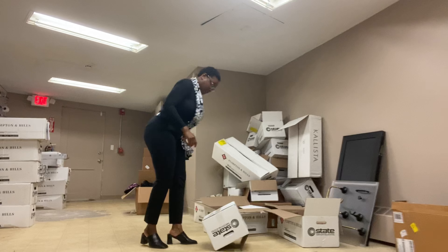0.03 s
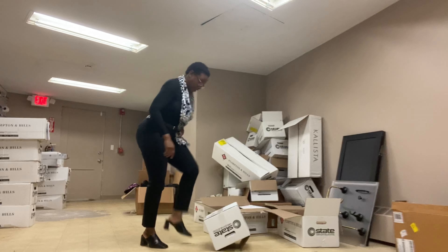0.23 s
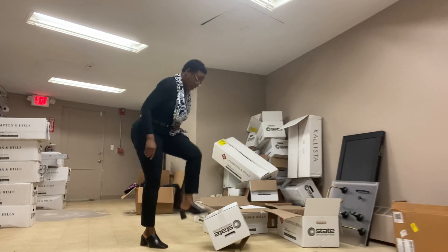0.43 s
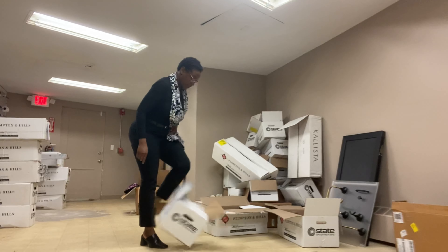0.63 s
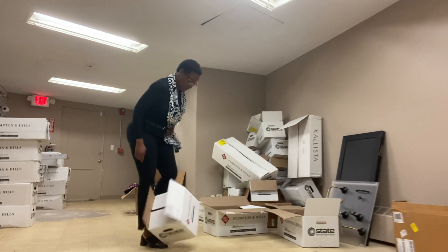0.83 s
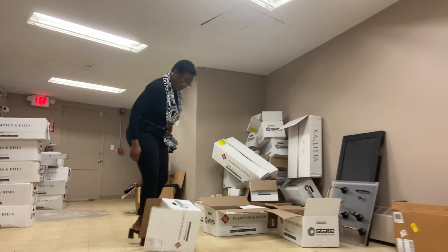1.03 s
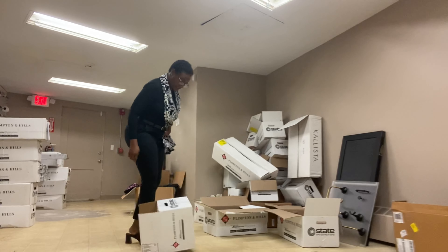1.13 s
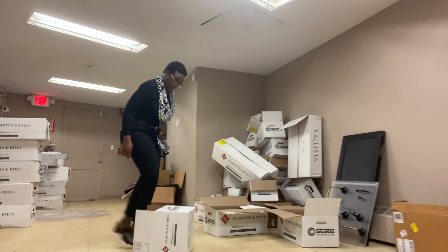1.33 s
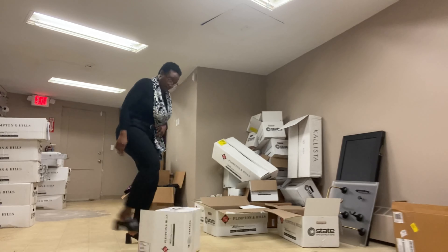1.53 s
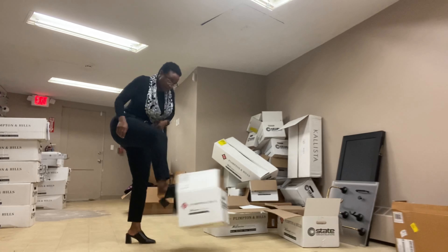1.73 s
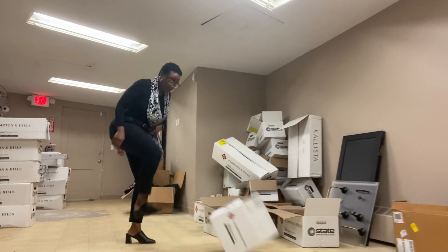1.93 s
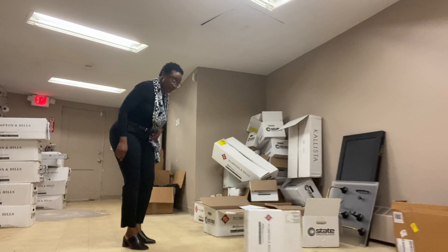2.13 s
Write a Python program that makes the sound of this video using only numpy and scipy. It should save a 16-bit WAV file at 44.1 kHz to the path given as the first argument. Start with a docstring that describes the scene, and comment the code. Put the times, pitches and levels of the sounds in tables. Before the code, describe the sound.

Hollow, papery blows on an empty carton: a loud kick first, then uneven tumbling knocks and scuffs, another kick, and two strong late thumps with rattling flaps; short lively room echo, recorded fairly close in stereo.

```python
"""An empty cardboard box is kicked and tumbles over the hard floor of a bare storeroom. After a faint knock at
the very start and a heel click come the blows: each pushes air, booms in the hollow, knocks the walls and
crackles the board; the heaviest add a falling thud as a wall bends in, flat faces smack, and the box scuffs. A
second heel click falls midway; two strong blows and a weaker one end the tumble, then the flaps rattle. Struck
modes and shaped noise make the sounds; decaying noise makes the room, over a quiet noise floor."""
import sys
import numpy as np
from scipy import signal
from scipy.fft import rfft, irfft
from scipy.io import wavfile
from scipy.ndimage import uniform_filter1d, map_coordinates

SR = 44100
rng = np.random.default_rng(int(sys.argv[2]) if len(sys.argv) > 2 else 0)


def pcm_store(signal):
    """Save signal as 16-bit PCM."""
    levels = np.round(np.clip(np.atleast_2d(signal), -1, 1) * 32767)
    wavfile.write(sys.argv[1], SR, levels.astype(np.int16).T)


N = 96446

CRACKLE_GRAIN_DB = 4.5  # unevenness of the grains in every contact
EVENT_S = 0.5  # length of buffer for one event


def undb(db):
    """Decibels to amplitude ratio."""
    return 10 ** (np.asarray(db) / 20)


def on_log(hz, table, column=1):
    """Reads a table along a log-frequency axis."""
    table = np.array(table, float)
    return np.interp(np.log(np.maximum(hz, 1)), np.log(table[:, 0]), table[:, column])


def seconds(length_s):
    """Time axis [s]."""
    return np.arange(int(length_s * SR)) / SR


def fade(t, t60_s):
    """Exponential decay, down 60 dB at t60_s."""
    return np.exp(-np.log(1000) * t / max(t60_s, 1e-3))


def response(gain_db, size=8192):
    """Minimum-phase impulse response, by folding the cepstrum, of a gain [dB] over frequency."""
    hz = np.arange(size // 2 + 1) * SR / size
    cepstrum = irfft(np.log(undb(gain_db(hz))))
    cepstrum[1:size // 2] *= 2
    cepstrum[size // 2 + 1:] = 0
    return irfft(np.exp(rfft(cepstrum)))


def through(x, impulse_response):
    """Convolution cut to the input length."""
    return signal.fftconvolve(x, impulse_response)[:len(x)]


def colour(x, table):
    """Filters by a table of gain over frequency."""
    return through(x, response(lambda hz: on_log(hz, table)))


def level(x, db):
    """Scales steady sound to an RMS level."""
    return x * undb(db) / np.std(x)


def strength(x, db):
    """Scales an event to the energy of 25 ms at this RMS level."""
    energy_span_s = 0.025
    return x * undb(db) * np.sqrt(energy_span_s * SR / np.sum(x ** 2))


def grains(t, spread_db, size=24):
    """Noise broken into half-millisecond grains of uneven size."""
    draws = np.minimum(rng.exponential(size=len(t) // size + 1), 4)
    sizes = np.repeat(draws, size)[:len(t)]
    return level(rng.standard_normal(len(t)) * undb(spread_db * sizes), 0)


def even(x):
    """Flattens the spectrum of a burst, so that it sounds dry and unpitched; keeps the first half."""
    flat = irfft(np.exp(1j * np.angle(rfft(x))), len(x))
    return flat * (np.arange(len(x)) < len(x) / 2)


def ring(t, modes):
    """Decaying modes of alternating sign; the box flexes, so their tuning differs from blow to blow."""
    scatter = 0.033  # standard deviation, share of the frequency
    total = np.zeros(len(t))
    for k, (hz, db, t60_s) in enumerate(modes):
        tuned_hz = hz * (1 + scatter * rng.standard_normal())
        total += (-1) ** k * undb(db) * fade(t, t60_s) * np.sin(2 * np.pi * tuned_hz * t)
    return total


def add(track, start_s, x):
    """Mixes an event into the track, cut at its end."""
    i = max(int(start_s * SR), 0)
    track[i:i + len(x)] += x[:max(N - i, 0)]


def blow(knock_db, wall_hz, boom_db, air_db, crackle_db, crumple_s):
    """One contact: a push and a short crumple drive the walls; the hollow booms and the board crackles."""
    # modes of the walls: (nominal frequency [Hz], relative level [dB], t60 [s])
    wall_modes = [(293, -1, 0.14), (363.2, 0, 0.093), (423, -1, 0.047), (477, 1.5, 0.057), (667, 0, 0.046),
                  (801, -1.5, 0.06), (1023, -6.5, 0.043), (1147, -8.5, 0.051), (1330, -2.5, 0.042)]
    # modes of the hollow: (nominal frequency [Hz], relative level [dB], t60 [s])
    hollow_modes = [(87.2, -1.5, 0.15), (117.2, 1, 0.1), (146.8, 3, 0.18), (223.7, -2, 0.089),
                    (290.8, -10, 0.37)]
    # colour of the knocked board: (frequency [Hz], relative gain [dB])
    board_colour = [(120, -14), (300, 4.5), (700, 0.5), (1200, -0.5), (1700, -7), (6000, -18),
                    (14000, -33.5)]
    # colour of the crackle: (frequency [Hz], relative gain [dB])
    crackle_colour = [(500, 4.5), (1900, 6), (5500, -4.5), (8500, 4.5), (13000, 0), (15500, -41)]
    # trims added to the levels of each blow
    wall_trim_db, board_trim_db, boom_trim_db, air_trim_db, crackle_trim_db = -10, -11, -5, -11.5, 1
    wall_spread_oct, crumple_share, rise_share = 0.51, 0.71, 0.22
    board_t60_s, crackle_t60_s, boom_rise_t60_s = 0.025, 0.029, 0.028
    air_hz, air_t60_s = 50.7, 0.15
    t = seconds(EVENT_S)

    # the crumple builds over a share of its time
    rise = 1 - np.exp(-t / max(rise_share * crumple_s, 1e-4))
    crumpling = rise * np.exp(-t / max(crumple_s, 1e-3))
    crumple = grains(t, CRACKLE_GRAIN_DB) * crumpling
    push = t == 0
    force = push + crumple_share * crumple / np.linalg.norm(crumple)

    def struck_db(hz):
        """Modes near the pitch of the struck wall respond most."""
        octaves = np.log2(np.maximum(hz, 1) / wall_hz)
        return -10 * np.log10(1 + (octaves / wall_spread_oct) ** 2)

    struck_modes = [(hz, db + struck_db(hz), t60_s) for hz, db, t60_s in wall_modes]
    walls = rise * through(force, ring(t, struck_modes))

    board_noise = grains(t, CRACKLE_GRAIN_DB) * rise * fade(t, board_t60_s + 2 * crumple_s)
    board = through(board_noise, response(lambda hz: on_log(hz, board_colour) + struck_db(hz)))

    crackle_envelope = crumpling + rise * fade(t, crackle_t60_s)
    crackle = colour(even(grains(t, CRACKLE_GRAIN_DB) * crackle_envelope), crackle_colour)

    air = ring(t, [(air_hz, 0, air_t60_s)]) * (1 - fade(t, air_t60_s)) ** 2
    # the hollow swells after the contact
    boom = ring(t, hollow_modes) * (1 - fade(t, boom_rise_t60_s))
    return (strength(walls, knock_db + wall_trim_db)
            + strength(board, knock_db + board_trim_db)
            + strength(boom, boom_db + boom_trim_db)
            + strength(air, air_db + air_trim_db)
            + strength(crackle, crackle_db + crackle_trim_db))


def thud(hz, sag_oct_per_s, db, swell_s):
    """A wall bending under a heavy blow: a sine that swells and dies while its pitch falls."""
    t = seconds(EVENT_S)
    falling_hz = hz * 2 ** (-abs(sag_oct_per_s) * t)
    phase = 2 * np.pi * np.cumsum(falling_hz) / SR
    return strength(t * np.exp(-t / swell_s) * np.sin(phase), db)


def tap(db, t60_s):
    """A hard, dry contact: a burst of gritty noise that dies fast."""
    # colour of the contact: (frequency [Hz], relative gain [dB])
    clack_colour = [(400, -7.5), (900, 9), (1700, 1.5), (3000, -4), (5000, -15.5), (14000, -23)]
    t = seconds(EVENT_S)
    burst = even(grains(t, CRACKLE_GRAIN_DB) * fade(t, t60_s))
    return strength(colour(burst, clack_colour), db)


def scuff(length_s, hiss_db, rumble_db):
    """Board rubbing on the floor: a grainy hiss over the shudder of the box, both following the pressure."""
    # colour of the rubbing: (frequency [Hz], relative gain [dB])
    hiss_colour = [(400, 2), (1200, 20.5), (5500, 2.5), (8500, 11), (13000, 7), (15500, -21)]
    # colour of the shudder: (frequency [Hz], relative gain [dB])
    rumble_colour = [(40, -45.5), (85, -10.5), (145, 20), (200, 1), (300, 12.5), (550, -13), (1100, -3.5),
                     (2500, -65.5)]
    grain_db = -3.5
    rise_share, fall_share = 0.74, 0.12  # of the length
    t = seconds(EVENT_S)
    pressure = np.minimum(t / rise_share, (length_s - t) / fall_share) / length_s
    hiss = level(colour(grains(t, grain_db), hiss_colour), hiss_db)
    rumble = level(colour(grains(t, grain_db), rumble_colour), rumble_db)
    return np.clip(pressure, 0, 1) * (hiss + rumble)


def rattle(count=8):
    """Loose flaps chattering: dry ticks at uneven gaps, each weaker than the last."""
    start_s, decay_s, first_db, tick_t60_s = 2.095, 0.054, -28, 0.006
    track, after_s = np.zeros(N), 0
    for gap_s in rng.uniform(.5, 2, count) / 72:
        add(track, start_s + after_s, np.exp(-after_s / decay_s) * tap(first_db, tick_t60_s))
        after_s += gap_s
    return track


def quiet():
    """Steady background: coloured noise."""
    # colour of the background: (frequency [Hz], relative gain [dB])
    quiet_colour = [(25, -59), (58, 12), (110, -13.5), (1500, -22.5), (13000, -29.5), (15500, -56)]
    return level(colour(rng.standard_normal(N), quiet_colour), -60.5)


def echoes(count=14):
    """Left and right response of the room: a dense noise tail that dies band by band."""
    # the room by band: (frequency [Hz], t60 [s], level against direct sound [dB], left-right likeness [0-1])
    room_bands = [(58.5, 0.91, 1, 0.75), (157, 0.34, 3, 0.95), (378, 0.38, -1, 0.18),
                  (920, 0.48, 1.5, 0.04), (2390, 0.53, 0.5, 0), (5270, 0.37, 6, 0), (8840, 0.38, 0, 0),
                  (14600, 0.42, -5, 0.4)]
    build_s, delay_s = 0.00059, 0.0034
    t = seconds(.8)
    hz = np.maximum(np.arange(len(t) // 2 + 1) * SR / len(t), 1)
    centres_hz = np.geomspace(40, 16000, count)
    noise, tail = rfft(rng.standard_normal((2, len(t)))), 0
    for k, centre_hz in enumerate(centres_hz):
        band = np.interp(np.log(hz), np.log(centres_hz), np.arange(count) == k)
        envelope = fade(t, on_log(centre_hz, room_bands)) * np.clip((t - delay_s) / build_s, 0, 1)
        shaped = irfft(noise * band, len(t)) * envelope
        mid, side = (v * np.sqrt(band.mean() / np.sum(v ** 2)) for v in shaped)
        alike = np.clip(on_log(centre_hz, room_bands, 3), 0, 1)
        common = np.sqrt((1 + alike) / 2) * mid
        opposed = np.sqrt((1 - alike) / 2) * side * np.array([[1], [-1]])
        tail = tail + undb(on_log(centre_hz, room_bands, 2)) * (common + opposed)
    return tail


def diffuse(x, size=13, count=71):
    """Evens out the narrow peaks of an echo, so that no single room mode hums on."""
    spectrum = rfft(x)

    def smooth(bins):
        power = uniform_filter1d(uniform_filter1d(abs(spectrum) ** 2, bins), bins)
        return np.maximum(power, 1e-12)

    flattened = irfft(spectrum * np.sqrt(smooth(count) / smooth(size)), len(x))
    return flattened[:len(x) * 3 // 4]


def storeroom(dry, count=5):
    """Direct sound plus echoes, whose pattern changes as the box moves from spot to spot."""
    out = 0
    place = np.linspace(0, count - 1, N)
    for spot in range(count):
        near = np.sqrt(np.maximum(1 - abs(place - spot), 0))
        out = out + np.array([through(dry * near, diffuse(ear)) for ear in echoes()])
    return dry + out


def scene():
    """Places the contacts, scuffs and rattle in time over the background, then rings the room."""
    # blows on the box: (time [s], wall knock [dB], pitch of struck wall [Hz], hollow boom [dB],
    # air push [dB], crackle [dB], crumpling time [s]); levels before the trims in blow
    blows = [(0.001, -28, 290, -26.5, -33, -46, 0.0019), (0.469, -13, 550, -24, -48, -39.5, 0.011),
             (0.579, -5.5, 590, -11.5, -18, -32.5, 0.0043), (0.693, -16.5, 257, -20, -30, -42.5, 0.012),
             (0.718, -18, 290, -17, -15, -52, 0.012), (0.79, -19.5, 272, -23.5, -34, -50, 0.025),
             (0.97, -10.5, 880, -20, -37, -39, 0.0035), (1.003, -25.5, 744, -19, -32, -44, 0.0056),
             (1.082, -18.5, 510, -21, -44, -47, 0.009), (1.343, -14, 254, -18.5, -27, -47, 0.013),
             (1.421, -25, 684, -18, -43, -47, 0.024), (1.54, -18, 266, -20, -39, -45.5, 0.027),
             (1.590, -9, 650, -15, -39, -34.5, 0.011), (1.607, -11, 308, -14, -37, -64, .006),
             (1.733, -15, 644, -21.5, -43, -41.5, 0.013), (1.960, -12, 810, -11.5, -28, -36, 0.0065),
             (2.027, -11, 590, -11.5, -30, -27.5, 0.0043), (2.094, -14, 790, -35, -36, -34.5, 0.014),
             (2.162, -22.5, 393, -18.5, -37, -34, 0.014)]
    # heavy blows bending a wall: (time [s], starting pitch [Hz], sag [octaves/s], level [dB], swell [s])
    thuds = [(0.579, 677, 50.5, -13, 0.0097), (0.970, 799.3, 0.43, -19, 0.0091),
             (1.589, 703, 5.9, -22, 0.0073), (1.960, 516, 29.1, -13, 0.0047),
             (2.027, 493, 74, -17.5, 0.0043)]
    # broad faces of board against shoe or floor: (time [s], level [dB], t60 [s])
    smacks = [(0.468, -27, 0.11), (.580, -29, 0.028), (0.968, -31, 0.032), (1.589, -24.5, 0.073),
              (1.957, -33, 0.037)]
    # box sliding, flaps brushing: (time [s], length [s], full-pressure hiss [dB], full-pressure rumble [dB])
    scuffs = [(0.481, 0.081, -34, -23), (0.672, 0.035, -36, -25), (0.807, 0.083, -45.5, -33.5),
              (1.229, 0.11, -46.5, -31.5), (1.358, 0.11, -48.5, -26.5), (1.60, 0.15, -41, -25),
              (2.051, 0.28, -42, -28.5)]
    # heel clicks on the floor: (time [s], level [dB])
    heels = [(0.096, -39), (1.149, -36.5)]
    dry = np.zeros(N)
    for source, events in ((blow, blows), (thud, thuds), (tap, smacks), (scuff, scuffs)):
        for start_s, *settings in events:
            add(dry, start_s, source(*settings))
    for start_s, db in heels:
        add(dry, start_s, tap(db, t60_s=0.025))
    return storeroom(dry + rattle() + quiet())


def record(dry):
    """Two close ports of unlike colour, the left later; a treble notch, rounded peaks and a steep top."""
    # left minus right: (frequency [Hz], level difference [dB])
    lean = [(50, -0.5), (110, -2.5), (180, 6), (290, 6.5), (450, 6), (700, 0), (2500, 3), (7000, 0.5)]
    notch_hz, notch_width_hz, notch_depth_db = 10500, 460, -26
    port_lag_ms, peak_limit, top_hz = 0.155, 0.95, 15400

    def port(x, side):
        def gain_db(hz):
            notch_db = notch_depth_db * np.exp(-((hz - notch_hz) / notch_width_hz) ** 2)
            return notch_db + side * on_log(hz, lean) / 2
        return through(x, response(gain_db))

    left, right = port(dry[0], 1), port(dry[1], -1)
    left = map_coordinates(left, [np.arange(N) - port_lag_ms * SR / 1000], order=5)
    both = np.array([left, right])
    both = both / (1 + (both / peak_limit) ** 6) ** (1 / 6)
    return signal.sosfilt(signal.ellip(8, .2, 70, top_hz, fs=SR, output="sos"), both)


dry = scene()
out = record(dry)
pcm_store(out)
```